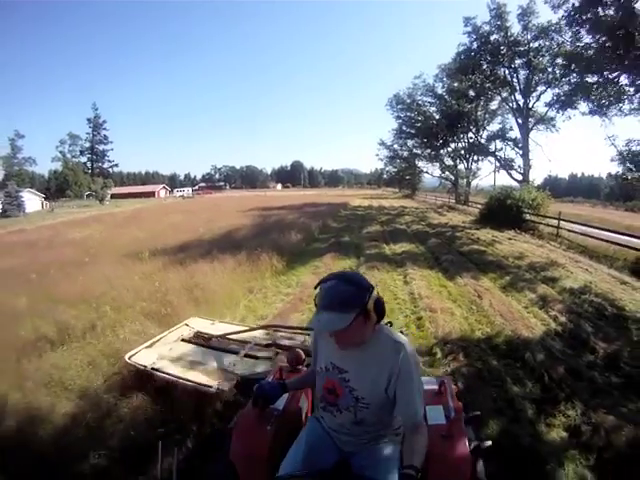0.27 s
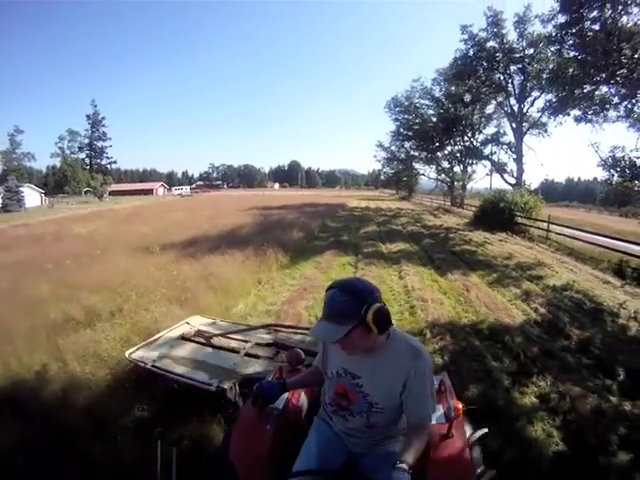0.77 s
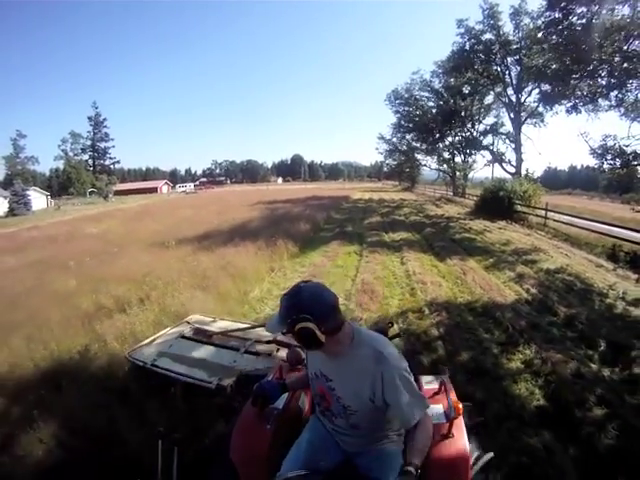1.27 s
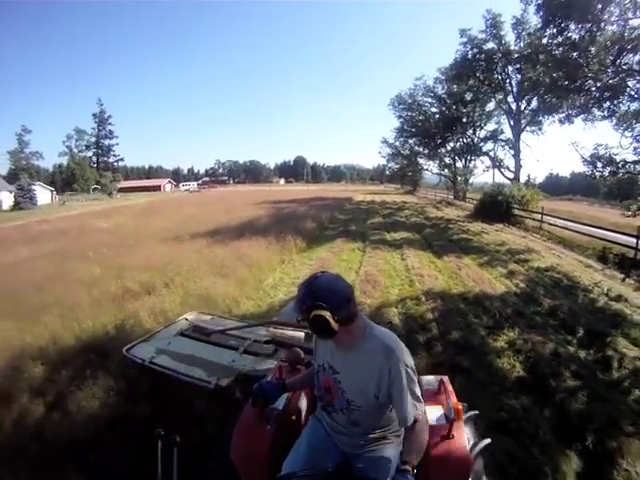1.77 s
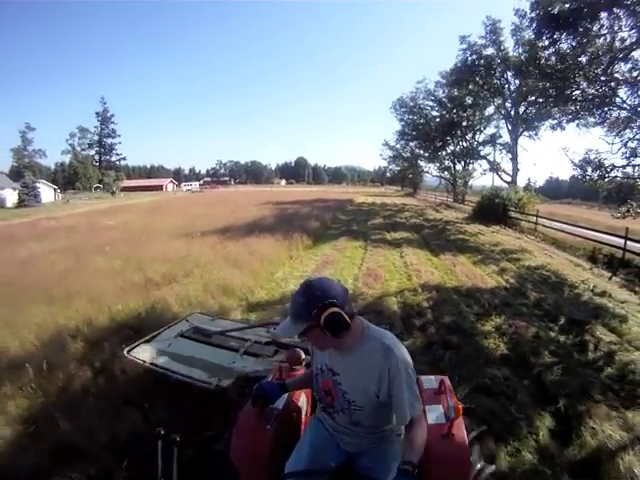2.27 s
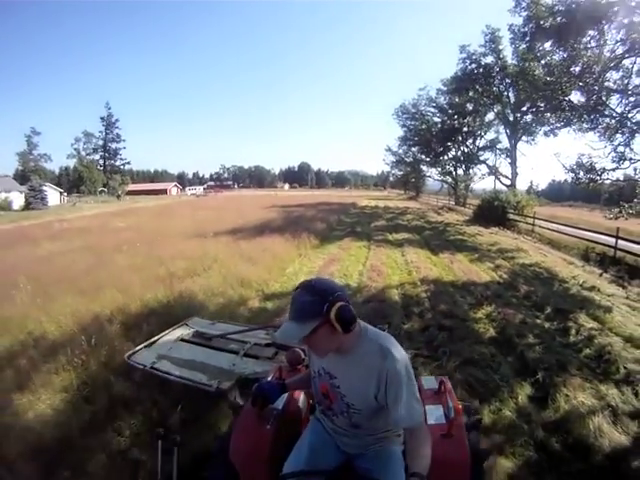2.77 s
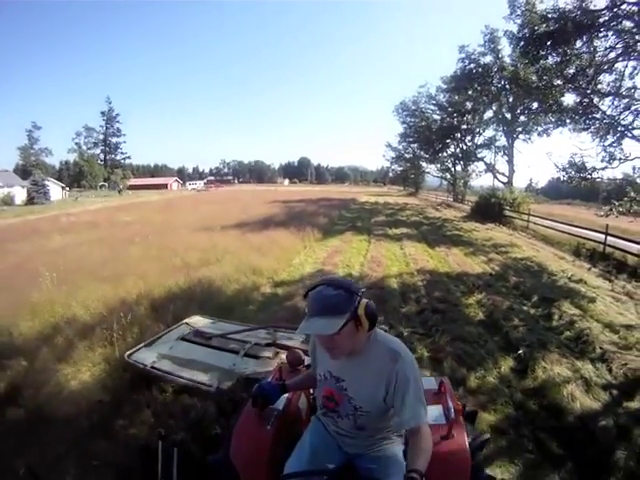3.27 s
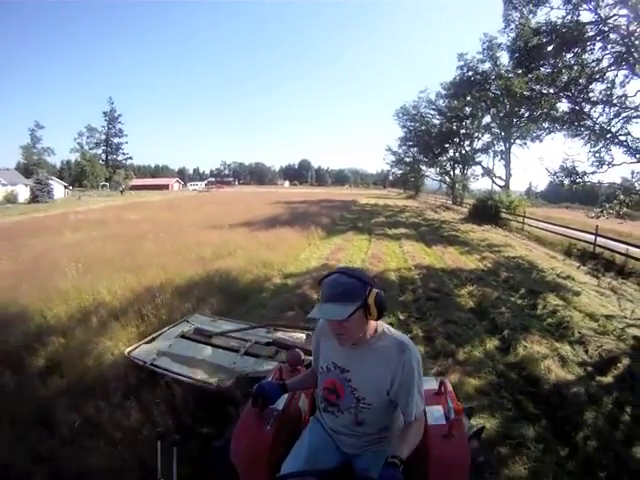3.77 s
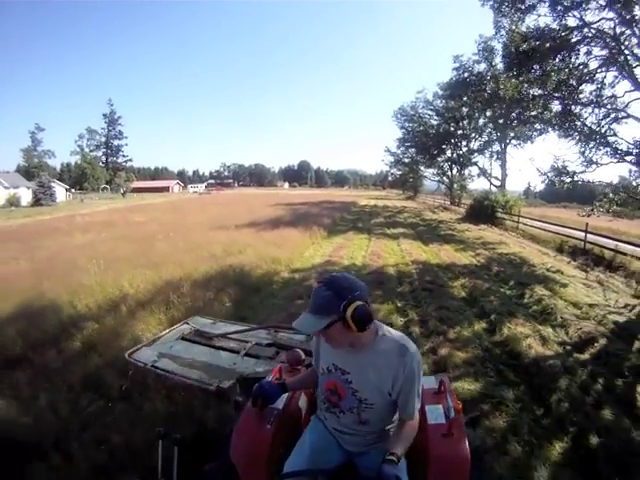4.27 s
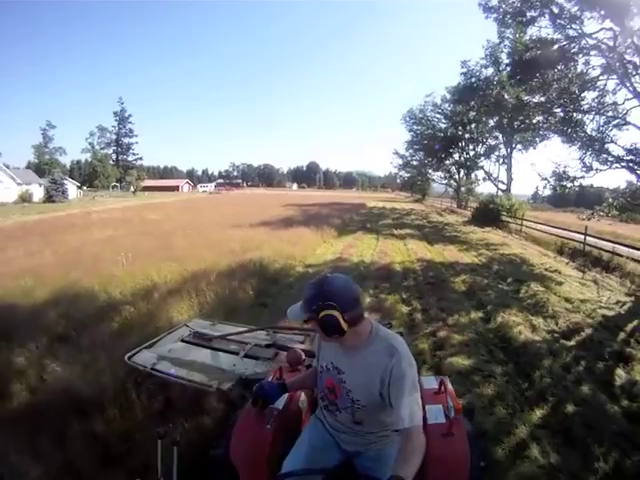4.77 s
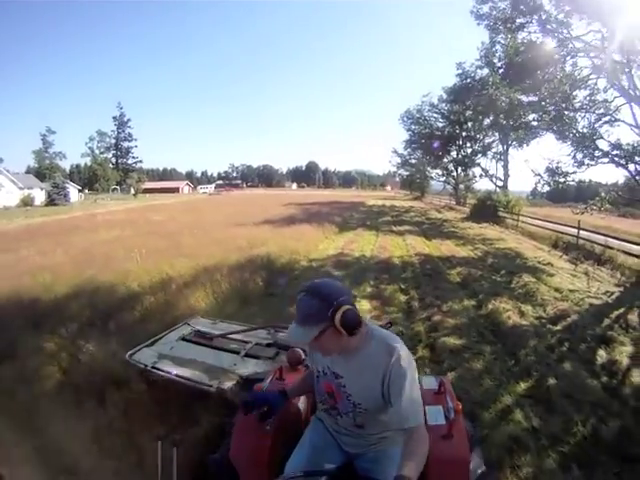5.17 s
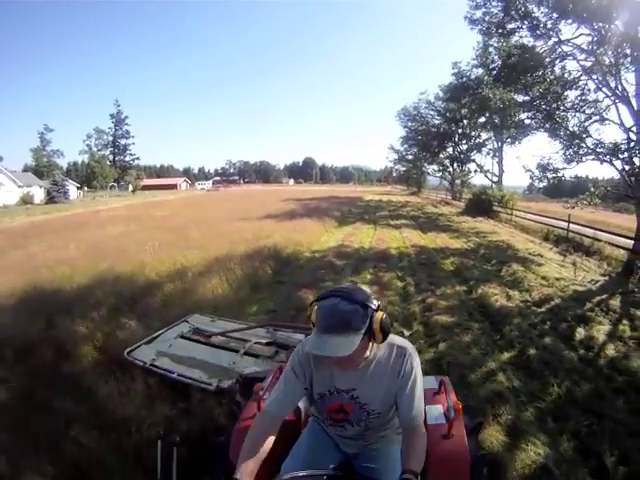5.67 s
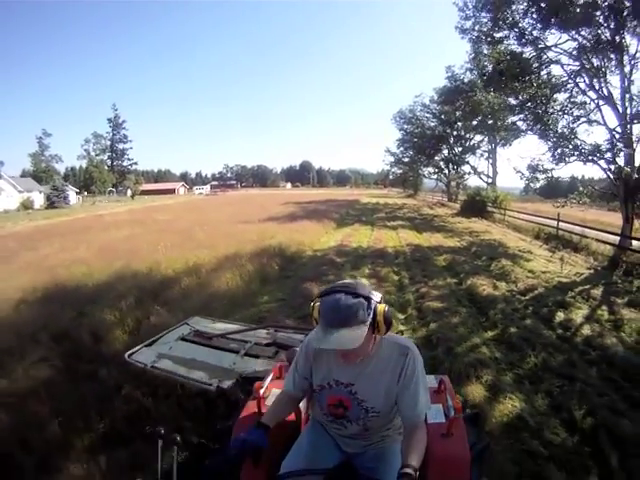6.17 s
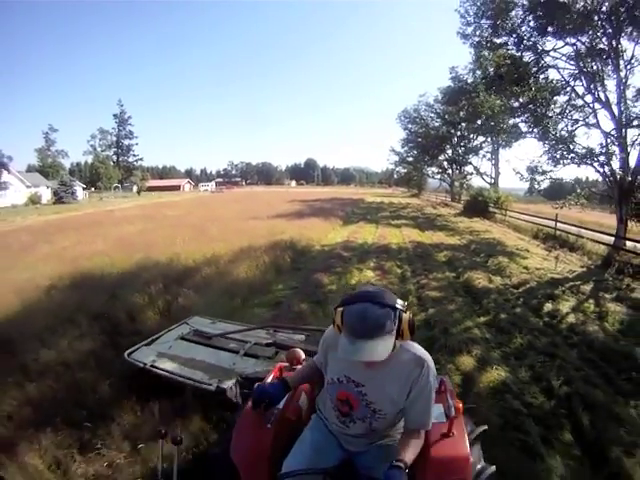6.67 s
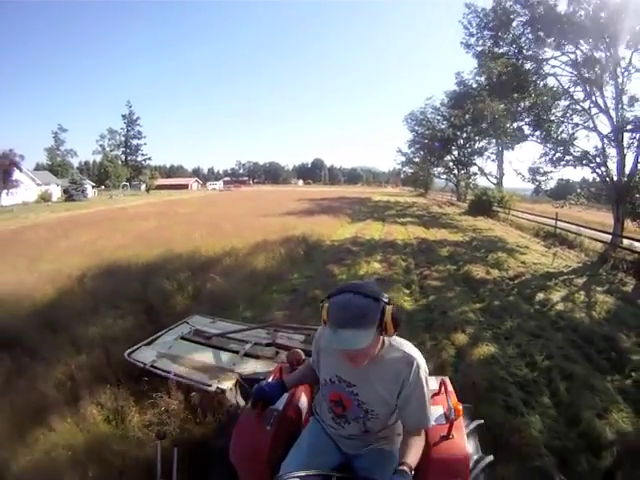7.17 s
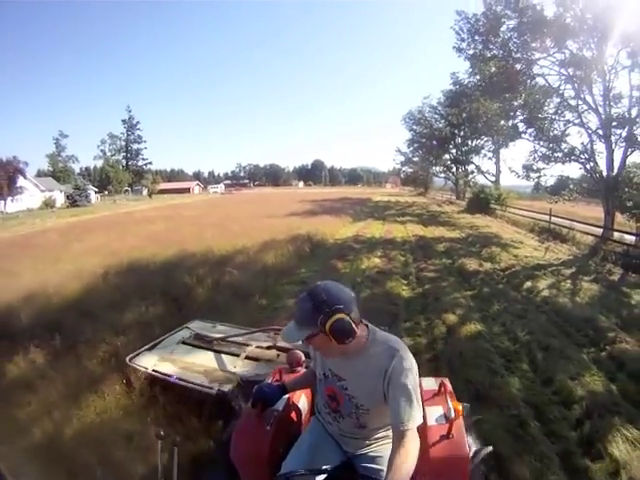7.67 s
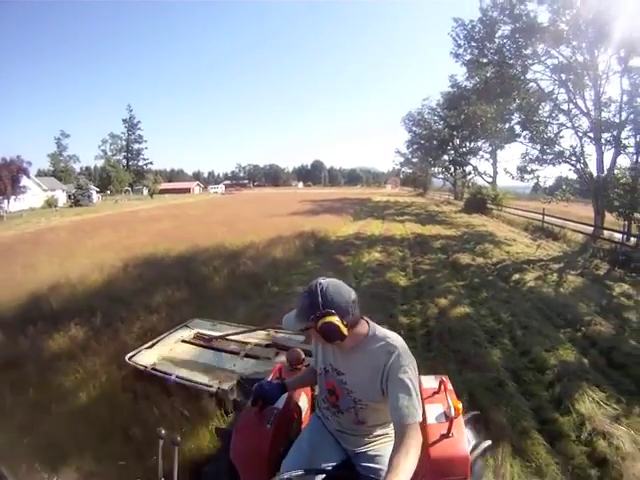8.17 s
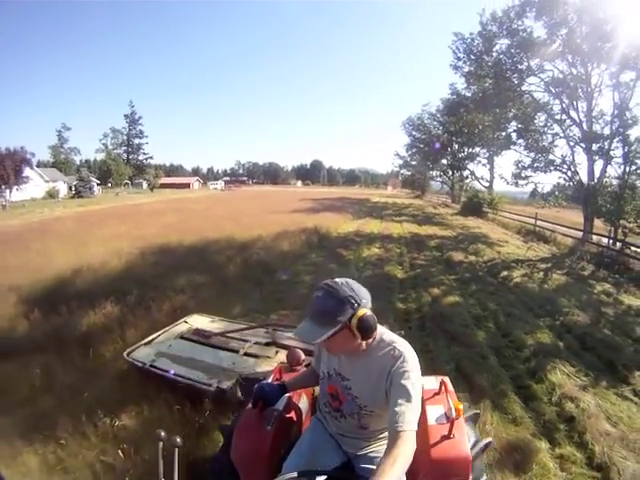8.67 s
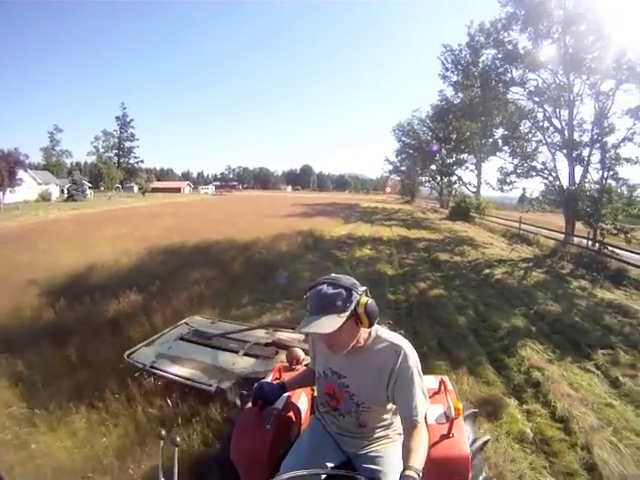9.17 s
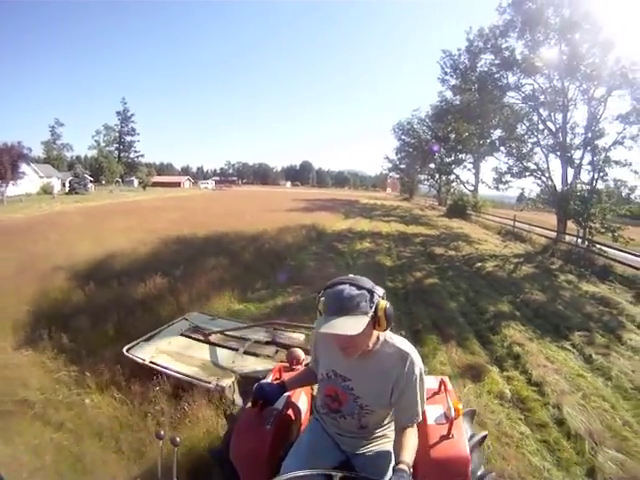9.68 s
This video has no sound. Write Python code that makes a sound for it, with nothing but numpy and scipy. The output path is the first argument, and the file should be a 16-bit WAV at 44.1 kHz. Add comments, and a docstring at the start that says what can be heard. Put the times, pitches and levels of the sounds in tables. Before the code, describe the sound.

Dense, rattling mower clatter and hollow drum hum over a lugging small diesel, chirping rapidly about fifteen times a second, revving slightly higher later.

```python
"""A small four-cylinder diesel tractor throbs as it mows tall grass, heard from behind the driver.
Tuned harmonics make the throb; a sharp chirp in every engine cycle is short squeaks ringing a few modes.
Gears whine as sines locked to the engine, and the drums hum as noise and shaft tones in a resonant cover.
Noise ticks ringing the body make the threshing, over a low frame rumble and a little wind.
The engine speeds up after about six seconds; the camera's microphone samples coarsely."""
import sys
import numpy as np
from scipy import signal
from scipy.fft import rfft, irfft
from scipy.io import wavfile
from scipy.ndimage import uniform_filter1d

SR = 44100
rng = np.random.default_rng(int(sys.argv[2]) if len(sys.argv) > 2 else 0)


def master(y):
    """Save y as 16-bit WAV."""
    cut = np.clip(np.atleast_2d(y).T, -1, 1)
    pcm = np.round(cut * 32767)  # scale
    wavfile.write(sys.argv[1], SR, pcm.astype(np.int16))


N = 437031
TIME = np.arange(N) / SR


def undb(db):
    """Decibels to gain."""
    return 10 ** (np.asarray(db) / 20)


def unit(x):
    """Scale to rms 1."""
    return x / np.sqrt(np.mean(x ** 2))


def steady(x, seconds):
    """Even out slow changes of level; rms near 1."""
    return x / np.sqrt(uniform_filter1d(x ** 2, int(seconds * SR)))


def curve(rows):
    """Join (time [s], value) rows by straight lines."""
    return np.interp(TIME, *np.transpose(rows))


def walk(rate):
    """Random levels, rate a second, joined by straight lines; spread near 1."""
    levels = rng.standard_normal(N // 100)
    return np.interp(TIME * rate, np.arange(N // 100), levels) * np.sqrt(3 / 2)


def between(working, opened, throttle):
    """Level in dB between working speed (throttle 0) and opened throttle (1)."""
    return working + (opened - working) * throttle


def causal(gain):
    """Minimum-phase response with these gains: it starts at once and then dies away."""
    cepstrum = irfft(np.log(gain + 1e-9))
    half = len(cepstrum) // 2
    cepstrum[1:half] *= 2
    cepstrum[half + 1:] = 0
    return np.exp(rfft(cepstrum))


def ring(x, modes, size=4096):
    """Pass x through steep resonances (frequency [Hz], width [Hz], level [dB]); rms 1."""
    f = np.maximum(np.arange(size + 1) * SR / (2 * size), 1)
    power = 0
    for hz, width, db in modes:
        detuning = (f / hz - hz / f) * hz / width
        power = power + (undb(db) / (1 + detuning ** 2)) ** 2
    response = irfft(causal(np.sqrt(power)))
    return unit(signal.fftconvolve(x, response)[:N])


# four-stroke cycle rate, half the crank speed: (time [s], rate [Hz])
CYCLE_RATE = [(0.0, 15.193), (0.85, 15.075), (1.9, 15.134), (2.65, 15.001), (4.1, 14.969), (4.4, 14.909),
              (5.7, 14.825), (6.1, 15.009), (6.65, 15.422), (6.95, 15.506), (7.3, 15.975), (7.7, 16.257),
              (8.6, 16.404), (9.91, 16.253)]
START_TURN = -.2163  # place in the cycle at the start [turns]
WORKING_HZ, OPENED_HZ = 15, 16.3  # cycle rates at working speed and with the throttle opened


def engine_speed():
    """Cycle rate [Hz], turns made, and throttle read from the rate (0 working, 1 opened)."""
    rate = curve(CYCLE_RATE)
    turn = START_TURN + np.cumsum(rate) / SR
    throttle = np.clip((rate - WORKING_HZ) / (OPENED_HZ - WORKING_HZ), 0, 1)
    return rate, turn, throttle


# exhaust harmonics before the throb, bark and load trims:
# (multiple of the cycle rate, level at working speed [dB], level with the throttle opened [dB])
EXHAUST_LINES = [(3, -61.7, -62.2), (4, -41.4, -40.0), (5, -47.4, -46.0), (6, -51.2, -46.7),
                 (7, -39.8, -37.1), (8, -39.0, -37.9), (9, -47.5, -46.7), (10, -51.9, -51.1),
                 (11, -38.3, -35.9), (12, -44.5, -38.3), (13, -42.5, -46.4), (14, -52.6, -53.8),
                 (15, -50.1, -52.5), (16, -46.3, -44.5), (17, -46.8, -52.3), (18, -55.9, -51.9),
                 (19, -55.3, -55.9), (20, -60.7, -55.0)]
# the four uneven exhaust puffs of a cycle: (place [turns], level [dB])
PUFFS = [(.258, 0), (.513, -4.4), (.779, -5.7), (.876, -9.3)]
PIPE_ECHO, PIPE_TURN = .85, .073  # share of each puff that comes back, and its delay [turns]
# between working speed and open throttle the engine lugs: it lopes more and its bark thins out
LUG_HZ, LUG_WIDTH_HZ, LUG_LOPE_DB, LUG_BARK_DB = 15.6, 0.47, 2.5, -5.5


def exhaust(turn, rate, throttle, load_db, rough_db=1.4, throb_db=2.9, bark_db=3.5):
    """Cycle harmonics, phased by four unequal puffs and their inverted pipe echo; load makes them louder."""
    lugging = np.exp(-((rate - LUG_HZ) / LUG_WIDTH_HZ) ** 2)
    total = 0
    for order, working, opened in EXHAUST_LINES:
        puffs = sum(undb(db) * np.exp(-2j * np.pi * order * place) for place, db in PUFFS)
        pipe = 1 - PIPE_ECHO * np.exp(-2j * np.pi * order * PIPE_TURN)
        lag = np.angle(puffs * pipe)
        lope, bark = order in (3, 5), 10 <= order <= 13
        db = between(working, opened, throttle) + lugging * (lope * LUG_LOPE_DB + bark * LUG_BARK_DB)
        trim_db = throb_db if order < 10 else bark_db
        total = total + undb(db + trim_db) * np.cos(2 * np.pi * order * turn + lag)
    return total * undb(load_db + rough_db * walk(45))


# where in the cycle the chirps come, levels relative to each other:
# (place [turns], level at working speed [dB], level with the throttle opened [dB])
CHIRP_PLACES = [(-.018, 0.5, -0.2), (0.236, -10.5, -6.5), (.49, -18, -16.5), (.78, -18.5, -12.5)]
# the few chirps that stand out from the rest: (time [s], level above the usual [dB])
STRONG_CHIRPS = [(0.67, 2.1), (3.13, 3.0), (5.34, 3.2), (6.08, 2.3), (6.54, 2.2), (8.6, 2)]
# what the chirp rings: (frequency [Hz], width [Hz], relative level [dB])
CHIRP_RESONANCES = [(2158, 130, -7.5), (2150, 650, -19.5), (1250, 320, -21.5), (3290, 850, -11)]
CHIRP_REBOUND = 0.26  # share by which a hard chirp weakens the next, so hard and soft tend to alternate


def chirps(turn, throttle, rub_hz=2205, rub_s=0.0011, grit=0.51, scatter_db=0.67,
           echo_s=0.00344, echo=0.059, gain_db=-18.5):
    """The firings shake a dry contact into a few milliseconds of stick-slip; one cylinder does it most."""
    cycles = np.arange(int(turn[-1]) + 1)
    t = np.arange(-256, 256) / SR
    rubs = np.zeros(N + len(t))
    for place, working, opened in CHIRP_PLACES:
        sizes, slips, pitches = rng.standard_normal((len(cycles), 3)).T
        sizes = signal.lfilter([1], [1, CHIRP_REBOUND], sizes)
        looseness = 1 - working / 16  # weak rubs are the least regular
        times = np.interp(cycles + place, turn, TIME)
        for when, size, slip, pitch in zip(times, sizes, slips, pitches):
            i = min(int(when * SR), N - 1)
            local = t - 4e-5 * looseness * slip  # small timing scatter [s]
            squeak = np.sin(2 * np.pi * rub_hz * (1 + .008 * pitch) * local)
            strong = [db for s, db in STRONG_CHIRPS if abs(s - when) < .01]
            extra_db = strong[0] if strong else scatter_db * looseness * size
            db = between(working, opened, throttle[i]) + extra_db
            envelope = undb(db) * np.exp(-(local / rub_s) ** 2)
            rubs[i:i + len(t)] += envelope * (squeak + grit * rng.standard_normal(len(t)))
    rubs = rubs[len(t) // 2:][:N]  # centre each rub on its moment
    rubs = rubs + echo * np.roll(rubs, int(echo_s * SR))  # off a nearby panel
    return undb(gain_db) * ring(rubs, CHIRP_RESONANCES)


# gear whine, rms before the flutter:
# (multiple of the cycle rate, level at working speed [dB], level with the throttle opened [dB])
GEAR_LINES = [(46.5, -53, -54), (66, -64, -49), (71, -50, -51), (76, -64, -51), (100, -62, -48),
              (102, -52, -54), (116, -42, -43), (171.5, -47, -56)]


def gears(turn, throttle, flutter_db=3.0, backlash=0.21):
    """Meshing teeth whine in step with the engine; level and phase (backlash [rad]) waver at random."""
    whine = 0
    for multiple, working, opened in GEAR_LINES:
        db = between(working, opened, throttle) + flutter_db * walk(11)
        whine = whine + undb(db) * np.sin(2 * np.pi * multiple * turn + backlash * walk(40))
    return np.sqrt(2) * whine


# hum of the mower drums before the gain and throb: (time [s], level [dB])
DRUM_LEVEL = [(0.0, -33.0), (1.8, -34), (2.1, -32.5), (2.7, -36.5), (3.9, -30.5), (4.5, -36.5),
              (5.1, -33.5), (5.4, -36.5), (6.0, -33), (6.6, -37), (6.9, -34), (7.2, -37), (7.5, -32.5),
              (8.4, -33), (9.9, -29.0)]
# ringing of the mower's sheet-metal cover: (frequency [Hz], width [Hz], relative level [dB])
COVER_MODES = [(454.1, 52, 0), (462.4, 18, 3), (420, 43, -7.5)]
DRUM_THROB_DB, DRUM_THROBS_PER_S = 2, 11  # the hum throbs at random around its level


def drums(turn, rate, driven=0.86, peak_turn=.33, gain_db=0.3):
    """Churned air rings the cover; shaft harmonics sing out as the speed carries them onto its resonance."""
    hum_hz = COVER_MODES[0][0]
    shaft = 0
    for order, size in [(28, 1.8), (30, .5), (31, 1.2)]:
        closeness = 1 / (1 + ((order * rate - hum_hz) / 14) ** 2)  # 14 Hz off resonance halves it
        shaft = shaft + size * closeness * np.sin(2 * np.pi * order * (turn - peak_turn))
    boom = ring(rng.standard_normal(N), COVER_MODES) + driven * shaft
    level_db = curve(DRUM_LEVEL) + gain_db + DRUM_THROB_DB * walk(DRUM_THROBS_PER_S)
    return undb(level_db) * steady(boom, 0.17)


# cutting as the stand of grass thickens and thins, before the clatter gain: (time [s], level [dB])
STAND_LEVEL = [(0.0, -25.0), (0.9, -24.0), (1.2, -21.5), (1.5, -26.0), (1.8, -23.5), (2.1, -25.5),
               (3.0, -24.5), (3.3, -25.5), (3.6, -24.0), (3.9, -25.5), (4.5, -24.0), (6.3, -24.5),
               (7.2, -26.0), (9.9, -21.5)]
LOAD_SHARE = .35  # dB of exhaust for each dB of the stand


def stand():
    """Cutting level of the stand [dB], and the exhaust load [dB] that follows it around its mean."""
    stand_db = curve(STAND_LEVEL)
    return stand_db, LOAD_SHARE * (stand_db - stand_db.mean())


# thick tufts that go into the drums: (time [s], level above the stand [dB])
THICK_TUFTS = [(0.26, 3), (1.35, 3), (2.34, 3), (3.75, 2), (3.92, 3), (4.39, 2.5), (4.8, 5), (7.92, 4.5),
               (9.49, 2.5)]
TUFT_S = 0.027  # half the time a tuft takes to pass
PATCHY_DB, PATCHES_PER_S = 0.84, 14  # unevenness of the grass between the tufts


def grass(stand_db):
    """Cutting level in dB: the stand of grass, its small random patches and the thick tufts."""
    tufts = sum(db * np.exp(-((TIME - s) / TUFT_S) ** 2) for s, db in THICK_TUFTS)
    return stand_db + PATCHY_DB * walk(PATCHES_PER_S) + tufts


# resonances of the machine and the camera case: (frequency [Hz], width [Hz], relative level [dB])
BODY_MODES = [(352, 285, -20), (555, 114, -19), (699, 48, -17), (792, 100, -22), (1052, 110, -19.5),
              (1265, 377, -20.5), (1319.5, 46, -16), (1583, 82, -20.5), (1746, 66, -12), (1887, 154, -10.5),
              (2069, 70, -3), (2152, 68, 0.5), (2420, 153, -9), (2745, 204, -10.5), (3040, 81, -10.5),
              (3260, 223, -4), (3520, 80, -7), (3833, 327, -8), (3865, 39, -3), (4080, 350, -20),
              (4414, 142, -14), (4806, 135, -21.5), (5300, 184, -24), (5680, 610, -35.5)]


def clatter(turn, cutting_db, grain_db=2.5, clump_db=1.67, firing_depth=0.095, firing_turn=0.28,
            lead_depth=0.31, lead_turns=0.032, gain_db=3.5):
    """Stalks on the blades and diesel knock: dense ticks that ring the body, bunched at the firings."""
    knock = 1 + firing_depth * np.cos(8 * np.pi * (turn - firing_turn))
    # the strongest firing knocks hardest
    knock = knock + lead_depth * np.exp(-((turn % 1 - firing_turn) / lead_turns) ** 2)
    total = 0
    for part in range(3):  # three sets of panels, each hit by clumps of its own
        modes = BODY_MODES[part::3]
        noise = rng.standard_normal(N)
        grain = np.repeat(rng.standard_normal(N // 32 + 1), 32)[:N]  # a new level every 32 samples
        ticks = noise * undb(grain_db * grain)
        share = np.sqrt(sum(width * undb(db) ** 2 for hz, width, db in modes))
        total = total + share * ring(ticks * undb(clump_db * walk(130)) * knock, modes)
    return undb(cutting_db + gain_db) * unit(total)


def rumble(throttle, frame_db=-46, wind_db=-60):
    """The frame shakes over the field, up to 2 dB more at open throttle; wind brushes the microphone."""
    frame = ring(rng.standard_normal(N), [(70, 41, -3.0), (178, 190, -7)])
    wind = ring(rng.standard_normal(N), [(30, 33, 0)])
    return undb(frame_db + 2 * throttle) * frame + undb(wind_db) * wind


def scene():
    """Engine speed drives the machine; the grass loads the mower and, through it, the exhaust."""
    rate, turn, throttle = engine_speed()
    stand_db, load_db = stand()
    engine = exhaust(turn, rate, throttle, load_db) + rumble(throttle)
    tractor = engine + chirps(turn, throttle) + gears(turn, throttle)
    mower = clatter(turn, grass(stand_db)) + drums(turn, rate)
    return (tractor + mower)[None]


TOP_HZ = 15350  # upper limit of the camera's sound


def record(dry):
    """The camera rounds peaks, samples at 12 kHz and holds values, mirroring sound into a thin treble."""
    rounded = dry / (1 + (dry / .9) ** 8) ** (1 / 8)
    coarse = signal.resample_poly(rounded, 40, 147, axis=1, window=("kaiser", 4))
    stepped = np.repeat(coarse, 4, axis=1)  # held values, now at 48 kHz
    held = signal.resample_poly(stepped, 147, 160, axis=1)[:, :N]
    return signal.sosfiltfilt(signal.ellip(8, .1, 50, TOP_HZ, fs=SR, output="sos"), held)


dry = scene()
out = record(dry)
master(out)
```